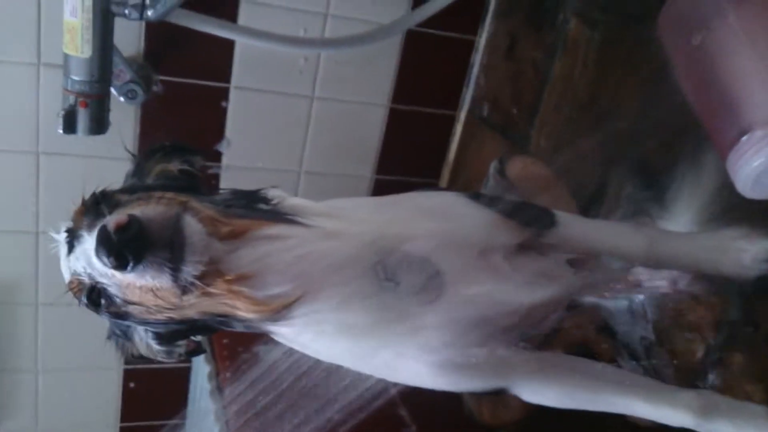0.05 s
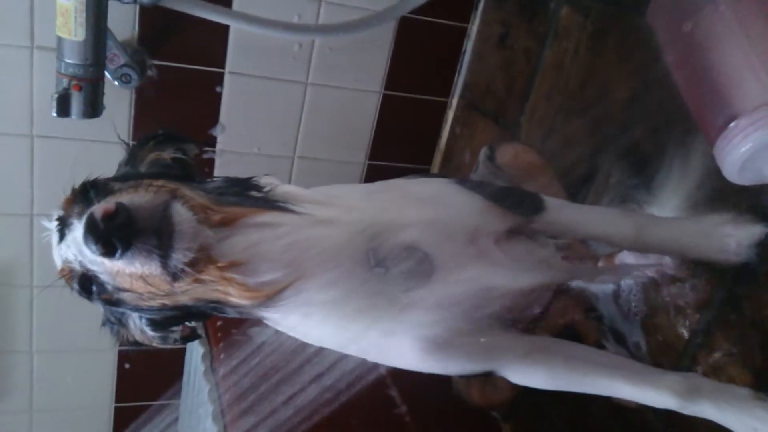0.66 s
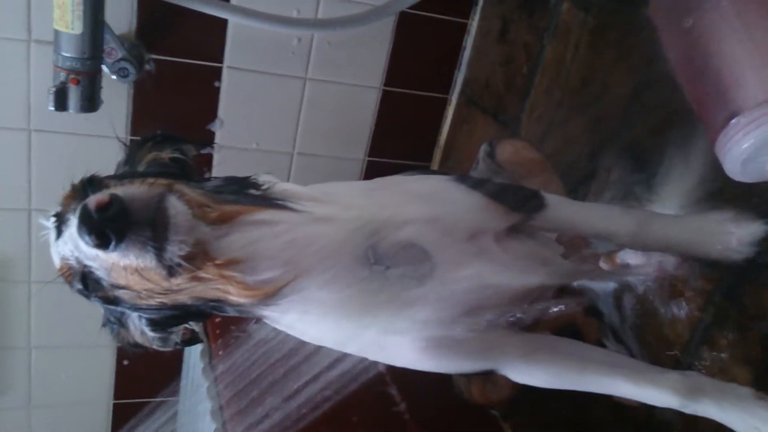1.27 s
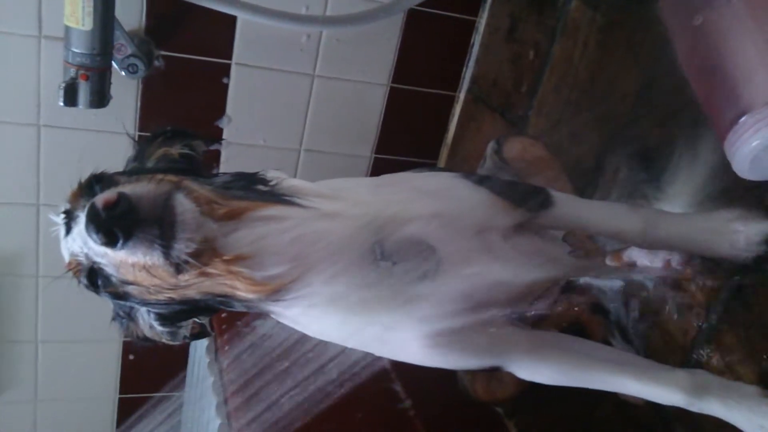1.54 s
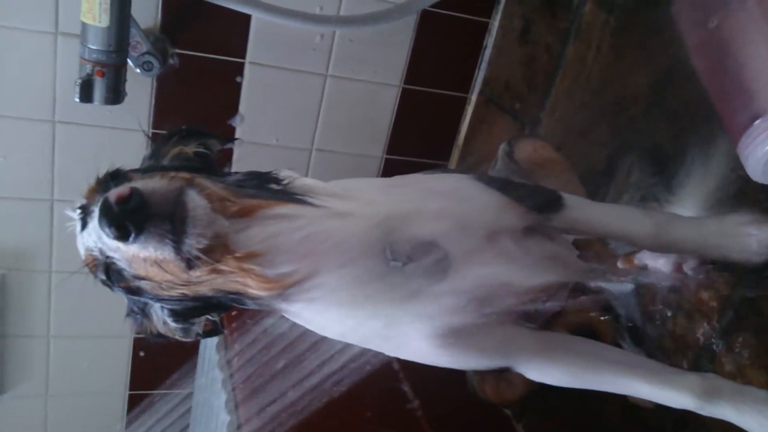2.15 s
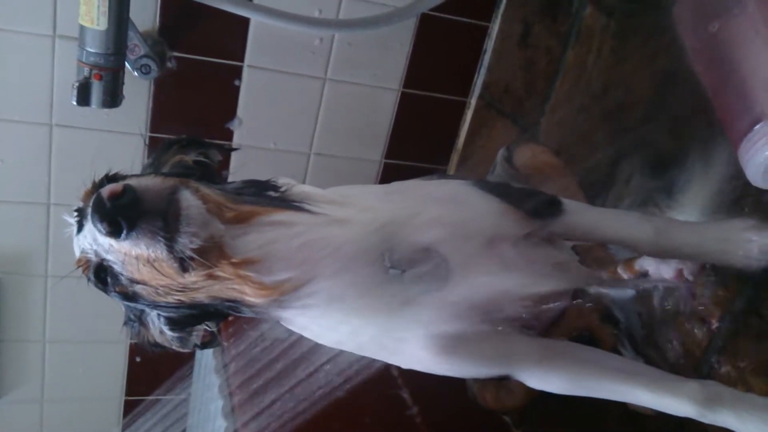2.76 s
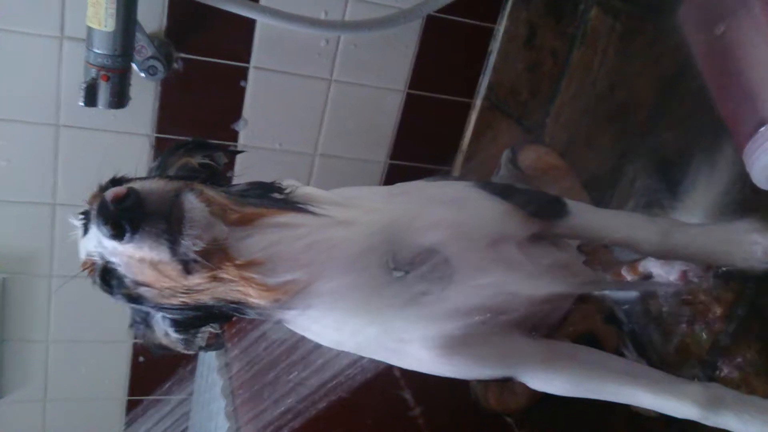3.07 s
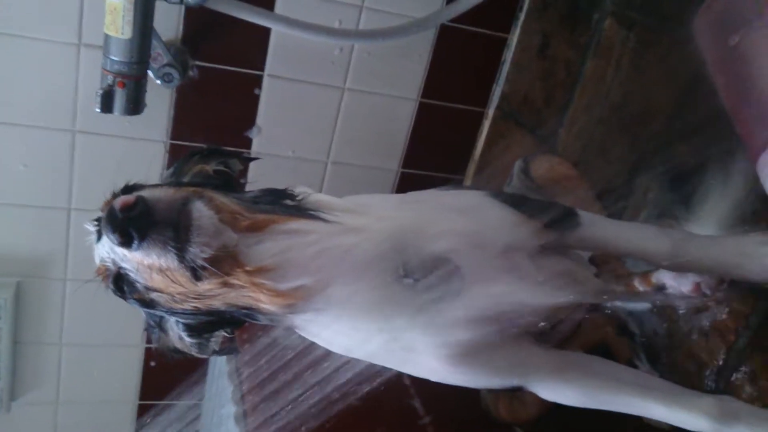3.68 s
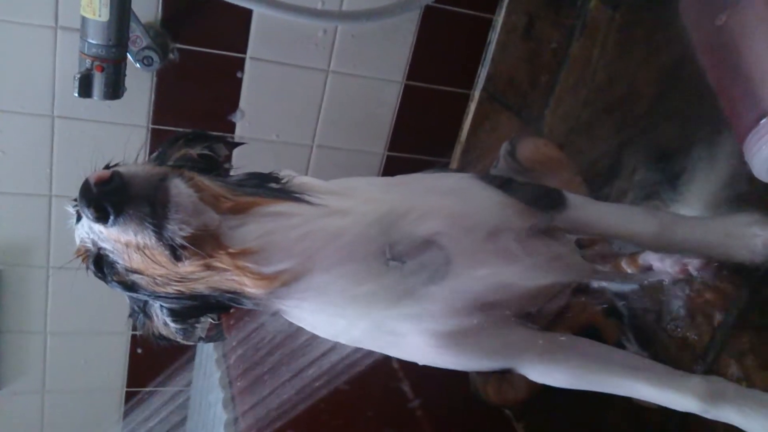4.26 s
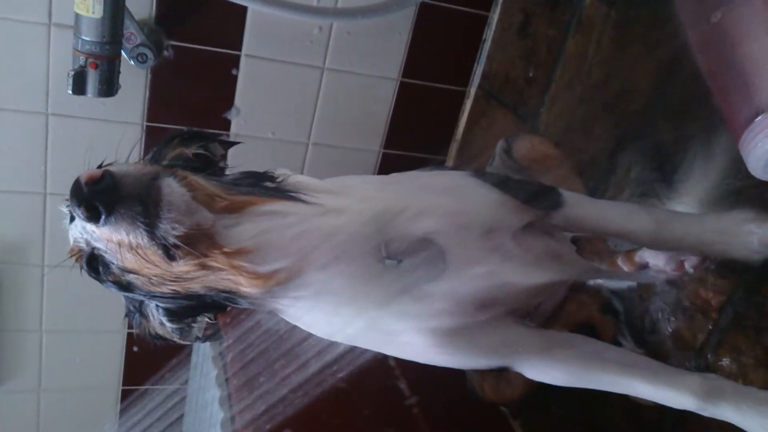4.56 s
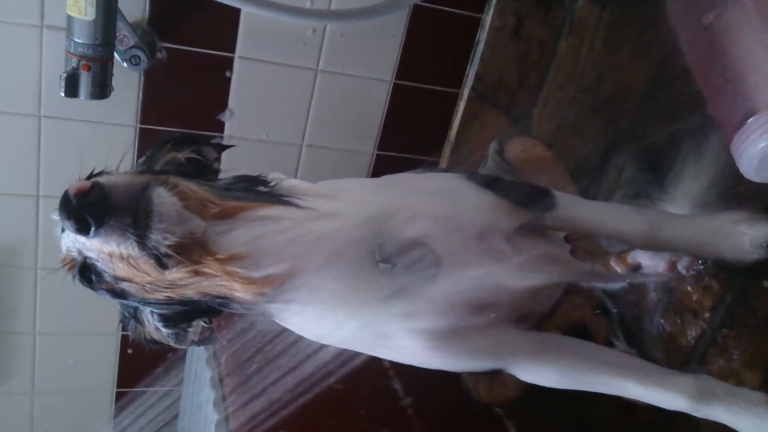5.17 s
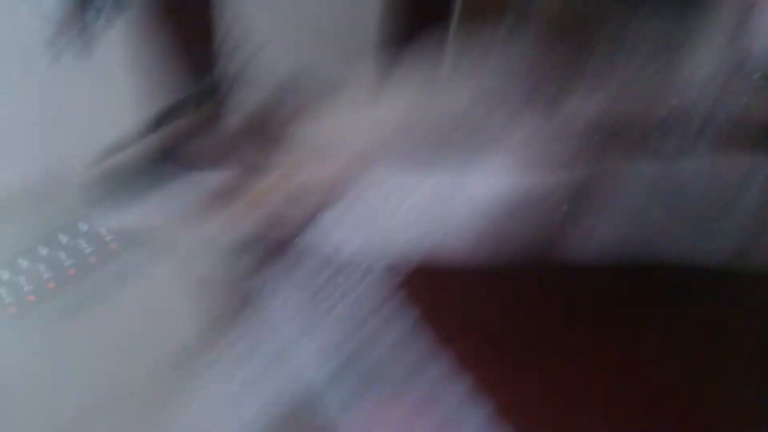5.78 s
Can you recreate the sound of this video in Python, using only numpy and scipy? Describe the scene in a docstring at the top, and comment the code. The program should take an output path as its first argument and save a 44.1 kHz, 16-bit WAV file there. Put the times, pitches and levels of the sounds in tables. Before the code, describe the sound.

Shower water hisses and patters without a break on wet fur and the floor, heard close up in a small, ringing tiled bathroom. Little splashes and occasional sharp drop ticks stand out from the spray. Two soft low thumps come from the hand holding the microphone, with a pair of barely audible falling hollow tones between them. At the very end the microphone swings and its low rumble grows.

```python
"""From the start a hand shower sprays steadily onto a dog and the floor of a small tiled bathroom.
Thousands of drops a second merge into a hiss that the room rings with; larger splashes stand out.
In the first three seconds the hand holding the microphones shifts and thumps softly on the left,
and two faint hollow notes sag under the water. At the end the microphones swing and their rumble grows."""
import sys
import numpy as np
from scipy import signal
from scipy.fft import rfft, irfft, next_fast_len
from scipy.io import wavfile

SR = 44100
rng = np.random.default_rng(int(sys.argv[2]) if len(sys.argv) > 2 else 0)


def store_pcm(level_fs):
    """Save levels as 16-bit WAV."""
    pcm = np.round(np.clip(level_fs, -1, 1) * 32767).astype(np.int16)
    wavfile.write(sys.argv[1], SR, np.atleast_2d(pcm).T)


N = 256662

# resonance of the left microphone's port: pitch_hz, width_hz, boost_db
LEFT_PORT_RESONANCE = (9330, 4000, 10.44)


def from_db(db):
    """Decibels to gain."""
    return 10 ** (np.asarray(db) / 20)


def unit_rms(x):
    """Scale to unit power."""
    return x / np.sqrt(np.mean(x ** 2) + 1e-20)


def drift(rate_hz):
    """A smooth random wobble with spread 1, mostly slower than rate_hz."""
    step, run_in = 40, 2000
    pole = np.exp(-2 * np.pi * rate_hz * step / SR)
    noise = rng.standard_normal(N // step + run_in + 2)
    slow = signal.lfilter([1], [1, -2 * pole, pole * pole], noise)[run_in:]
    return np.interp(np.arange(N) / step, np.arange(len(slow)), unit_rms(slow))


def at_hz(points, hz, column=1):
    """Read one column of a spectrum on a log-frequency axis."""
    points = np.array(points)
    return np.interp(np.log(hz + 1e-9), np.log(points[:, 0]), points[:, column])


def colour(x, spectrum):
    """Give each channel its own smooth EQ curve."""
    size = next_fast_len(N)
    hz = np.fft.rfftfreq(size, 1 / SR)
    gains = from_db([at_hz(spectrum, hz, column=1), at_hz(spectrum, hz, column=2)])
    return irfft(rfft(x, size) * gains, size)[:, :N]


def butter(x, hz, kind, order=2):
    """Causal Butterworth filter."""
    return signal.sosfilt(signal.butter(order, np.clip(hz, 1, .45 * SR), kind, fs=SR, output="sos"), x)


def resonate(x, hz, width_hz, db):
    """A bell EQ that lifts or dips one resonance."""
    gain, angle = from_db(db / 2), 2 * np.pi * hz / SR
    width = np.sin(angle) * width_hz / hz / 2
    tuning = -2 * np.cos(angle)
    zeros = [1 + width * gain, tuning, 1 - width * gain]
    poles = [1 + width / gain, tuning, 1 - width / gain]
    return signal.lfilter(zeros, poles, x)


def swell(start_s, rise_s, sharpness):
    """An envelope that peaks at 1 after rise_s and dies away."""
    age = np.maximum(np.arange(N) / SR - start_s, 0) / rise_s
    return (age * np.exp(1 - np.minimum(age, 50))) ** sharpness


def bathroom(x, wet_db, t60_s=.31):
    """Direct sound plus dense reflections off the tiles, different at each microphone."""
    t = np.arange(SR // 2) / SR
    tail = rng.standard_normal((2, len(t))) * from_db(-60 * t / t60_s) * (t > .003)
    tail /= np.sqrt(np.sum(tail ** 2, axis=1, keepdims=True))
    return x + from_db(wet_db) * signal.fftconvolve(x, tail, axes=1)[:, :N]


def rumble(lumpy_db, swing_start_s, swing_rise_s):
    """Uneven rumble, separate in each microphone; its low end builds as they are swung away."""
    # tone of the rumble: frequency_hz, left_db, right_db
    rumble_eq = [(6, -42, -29), (15.8, -16, -17), (25, -33, -19.5), (40.2, -33, -32), (60, -33.5, -32.5),
                 (100, -43, -33.5), (168, -39.5, -41), (260, -51, -50.5), (497, -86, -68)]
    bed = colour(rng.standard_normal((2, N)), rumble_eq)
    bed *= from_db(lumpy_db * np.array([drift(4), drift(2.8)]))
    swing = np.clip((np.arange(N) / SR - swing_start_s) / swing_rise_s, 0, 1)
    return bed + swing * from_db([[15], [5]]) * butter(bed, 80, "low", order=1)


def hollow_notes(roughness):
    """Faint, rough low notes swell, sag in pitch and fade under the water."""
    # the notes: start_s, pitch_hz, sag_octaves_per_s, rise_s, level_db
    notes = [(1.765, 273, 2.5, .022, -54), (1.92, 287, .9, .055, -62)]
    out = 0
    for start_s, pitch_hz, sag, rise_s, level_db in notes:
        age = np.maximum(np.arange(N) / SR - start_s, 0)
        phase = 2 * np.pi * np.cumsum(pitch_hz * 2 ** (-sag * age)) / SR
        tone = np.sin(phase) + roughness * drift(35) * np.cos(phase)
        out += from_db(level_db) * swell(start_s, rise_s, sharpness=1.5) * tone
    return bathroom(np.array([out, out]), wet_db=-3)


def grip(knock_s, finger_db, knock_db, squeeze_db):
    """Pressure pulses of one grip shift: two fingers touch, the case knocks, a squeeze, a release."""
    def pulse(delay_s, rise_s, db):
        return from_db(db) * swell(knock_s + delay_s, rise_s, sharpness=1.33)
    first_finger = pulse(delay_s=-.046, rise_s=.006, db=finger_db)
    second_finger = pulse(delay_s=-.023, rise_s=.006, db=finger_db - 5)
    knock = pulse(delay_s=0, rise_s=.0019, db=knock_db)
    squeeze = pulse(delay_s=0, rise_s=.037, db=squeeze_db)
    release = pulse(delay_s=.082, rise_s=.017, db=squeeze_db + 3)
    return squeeze - first_finger - second_finger - knock - release


def handling():
    """The hand presses on the left port; the microphone lets steady pressure leak away."""
    # shifts of the hand: knock_s, finger_db, knock_db, squeeze_db
    grip_shifts = [(-.014, -26, -24, -22.5), (1.2275, -19, -17.5, -23), (2.975, -26.5, -14.5, -21.5)]
    pressure = sum(grip(*shift) for shift in grip_shifts)
    return butter(pressure, 1.5, "high", order=1) * from_db([[0], [-30]])


def near_drops(rise_s):
    """Stray drops tick near the left microphone and ring its port for a moment."""
    # close drops: start_s, left_peak_db
    landings = [(.425, -14), (4.163, -15), (4.793, -13), (5.04, -21)]
    envelope = sum(from_db(db) * swell(start_s, rise_s, sharpness=.9) for start_s, db in landings)
    port_tone = np.sin(2 * np.pi * LEFT_PORT_RESONANCE[0] * np.arange(N) / SR)
    return envelope * port_tone * from_db([[0], [-15]])


def bubbles(per_s, cycles, spread_db):
    """Small bubbles ring briefly in the water on the floor, rising in pitch as they surface."""
    out = np.zeros((2, N + SR))
    for when, pitch, size, pan in rng.random((int(per_s * N / SR), 4)):
        hz = 1100 * 5.5 ** pitch
        age = np.linspace(0, 1, int(cycles * SR / hz))
        chirp = np.sin(2 * np.pi * cycles * age * (1 + .06 * age))
        envelope = from_db(-40 * age + spread_db * size ** 3) * np.sqrt(hz)
        at = int(when * N)
        out[:, at:at + len(age)] += np.sqrt([[pan], [1 - pan]]) * chirp * envelope
    return unit_rms(bathroom(out[:, :N], wet_db=-2.5))


def patter(per_s, spread_db):
    """Bigger drops tick on tile and wet fur, each from its own direction."""
    when, bearing, size, polarity = rng.random((int(per_s * N / SR), 4)).T
    level_db = spread_db * np.minimum(-np.log(1 - size), 5)   # many soft, a few loud
    hits = from_db(level_db) * np.sign(polarity - .5)
    at_left = (when * (N - 40)).astype(int) + 20
    at_right = at_left + np.round(24 * (bearing - .5)).astype(int)
    ticks = np.array([np.bincount(at_left, hits, N), np.bincount(at_right, hits, N)])
    return unit_rms(bathroom(ticks, wet_db=-5.5))


def splashes(rise_s, width, lesser_per_s):
    """Gathered water slaps down: each splash is a short spatter around one pitch."""
    # the featured splashes: start_s, pitch_hz, relative_level_db
    accents = [(0.496, 5000, 2.5), (1.168, 3130, 4.5), (1.489, 8000, -1), (2.416, 2000, 4),
               (2.489, 1700, 4.5), (2.748, 7800, 0.5), (3.755, 1520, 6), (4.348, 7800, 0.5),
               (4.456, 2050, 4), (4.825, 5400, 3), (5.033, 9200, -1.5), (5.377, 1970, 4),
               (5.403, 1380, 6.5), (5.455, 3100, 4), (5.648, 2000, 5.5)]
    # lesser splashes fall at random; the smaller they are, the higher and fainter
    chances = rng.random((int(lesser_per_s * N / SR), 2))
    lesser = [(start_s, 1600 * 2 ** octave, -1.5 * octave) for start_s, octave in chances * [N / SR, 2.2]]
    envelope = swell(0, rise_s, sharpness=.26)[:SR // 6]
    out = np.zeros((2, N + SR))
    for start_s, pitch_hz, level_db in accents + lesser:
        burst = envelope * rng.standard_normal((2, len(envelope)))
        spatter = butter(burst, [pitch_hz / (1 + width), pitch_hz * (1 + width)], "band")
        at = int(start_s * SR)
        out[:, at:at + len(envelope)] += from_db(level_db) * spatter
    return bathroom(out[:, :N], wet_db=-6.5)


def spray_hiss(surge_db, patchy_db, flutter_db):
    """Countless fine drops blur in the room; the jets wander, so each band swells and flutters."""
    # how alike the room sounds at the two microphones: frequency_hz, correlation
    stereo_likeness = [(60, .1), (150, 0.47), (300, 1), (650, 0.82), (1000, 0.58), (1400, -0.11),
                       (3000, -0.098), (15000, -0.036)]
    size = next_fast_len(N)
    hz = np.fft.rfftfreq(size, 1 / SR)
    alike = at_hz(stereo_likeness, hz)
    mid, side = rfft(rng.standard_normal((2, N)), size)
    field = np.sqrt(1 + alike) * mid + np.sqrt(1 - alike) * side * [[1], [-1]]
    edges_hz = np.r_[0, np.geomspace(700, 11200, 9), SR]   # half octaves between the outer bands
    surge = surge_db * drift(25)
    below, hiss = drift(4.6), 0
    for low, high in zip(edges_hz, edges_hz[1:]):
        above = drift(10.7)   # neighbouring bands share part of their motion
        band = irfft(field * ((hz >= low) & (hz < high)), size)[:, :N]
        uneven = (3000 / max(low, 1500)) ** .4   # the finest drops are the most numerous and even
        hiss += band * from_db(surge + uneven * patchy_db * (below + above) + flutter_db * drift(58))
        below = above
    treble = butter(hiss, 1600, "high", order=1)   # up here the standing waves crowd into a fine comb
    return unit_rms(hiss - treble + bathroom(treble, wet_db=-12.5))


def shower():
    """All the water, coloured by the room's standing waves and the left microphone's port."""
    # tone of the spray at the microphones: frequency_hz, left_db, right_db
    spray_eq = [(320, -49, -45), (443, -45.5, -43), (640, -38.5, -34), (1000, -33, -30), (1706, -34, -26.5),
                (2540, -28.5, -20), (3300, -26, -25), (4530, -26, -24.5), (6700, -27.5, -25),
                (8600, -25.5, -31.5), (12000, -28, -29), (13400, -25, -27), (15300, -26, -42)]
    # standing waves between the tiled walls, negative near a node: pitch_hz, width_hz, left_db, right_db
    standing_waves = [(412.3, 12.3, 15, 8.5), (431.7, 25, 7.5, 9.5), (491, 14.5, 7.5, 8.5),
                      (537, 24, 3.5, 7.5), (607.4, 19.5, 6.5, 8.5), (707.4, 23.6, 13, 14.5),
                      (745, 23, 5, 4), (843, 17, 1, 2), (1011, 28, 1.5, 7.5), (1105, 17, 9, 0.5),
                      (1226, 39, 7.5, 11), (1286, 27, 2, -2), (1347, 23, 9.5, 7), (1436, 24, 3, 5)]
    water = from_db(-.86) * spray_hiss(surge_db=.32, patchy_db=.56, flutter_db=1)
    water += from_db(-7.5) * patter(per_s=3000, spread_db=3.5)
    water += from_db(-21) * bubbles(per_s=140, cycles=24, spread_db=9)
    water += from_db(2) * splashes(rise_s=.0052, width=.17, lesser_per_s=4)
    left, right = butter(colour(water, spray_eq), 243, "high")
    for pitch_hz, width_hz, left_db, right_db in standing_waves:
        left = resonate(left, pitch_hz, width_hz, left_db)
        right = resonate(right, pitch_hz, width_hz, right_db)
    return np.array([resonate(left, *LEFT_PORT_RESONANCE), right])


def scene():
    """The shower and its stray drops up front; thumps, hollow notes and rumble underneath."""
    return (shower() + near_drops(rise_s=.00017) + handling() + hollow_notes(roughness=.88)
            + rumble(lumpy_db=1.5, swing_start_s=5.68, swing_rise_s=.11))


def record(dry):
    """A steep low-pass takes off the very top."""
    cutoff_hz = 15520
    return signal.sosfilt(signal.ellip(14, .1, 80, cutoff_hz, fs=SR, output="sos"), dry)


dry = scene()
out = record(dry)
store_pcm(out)
```